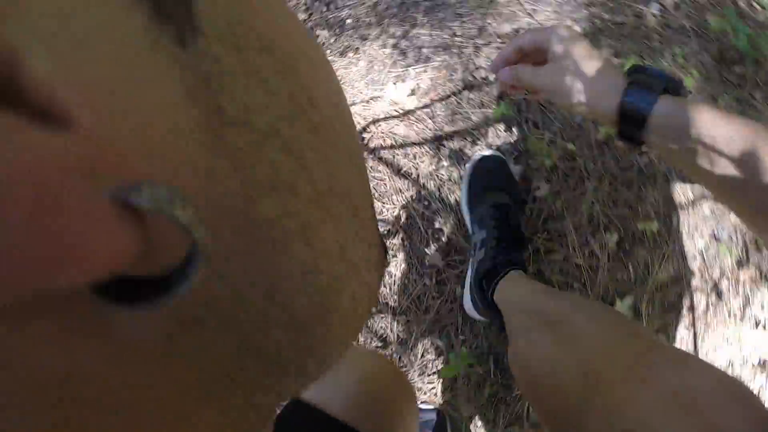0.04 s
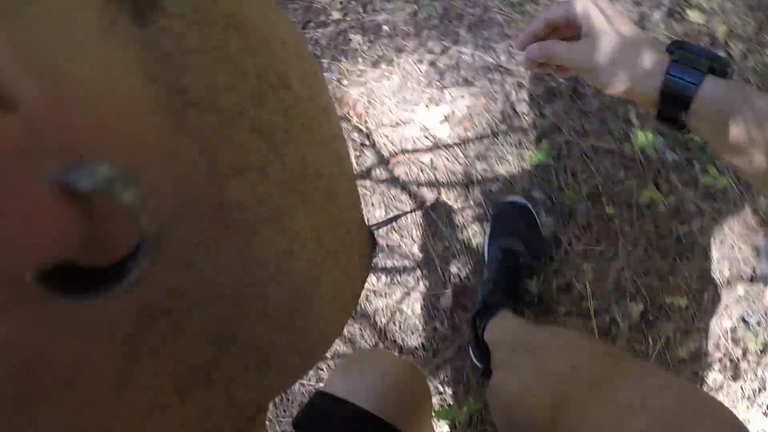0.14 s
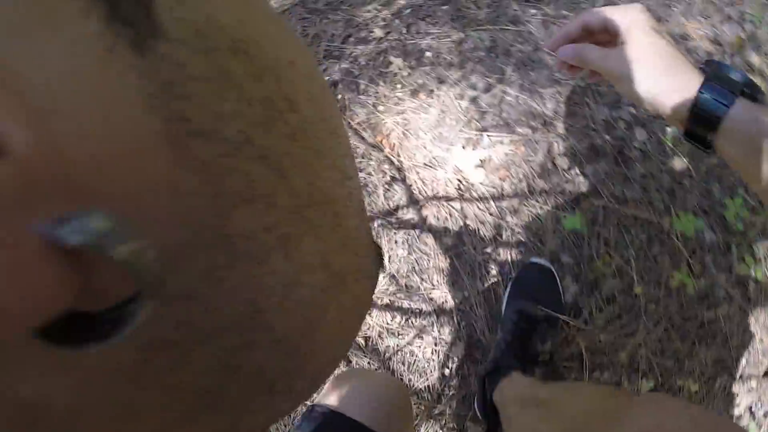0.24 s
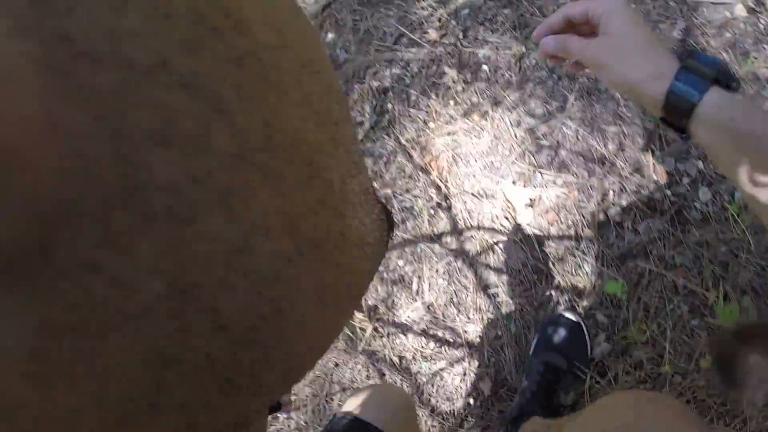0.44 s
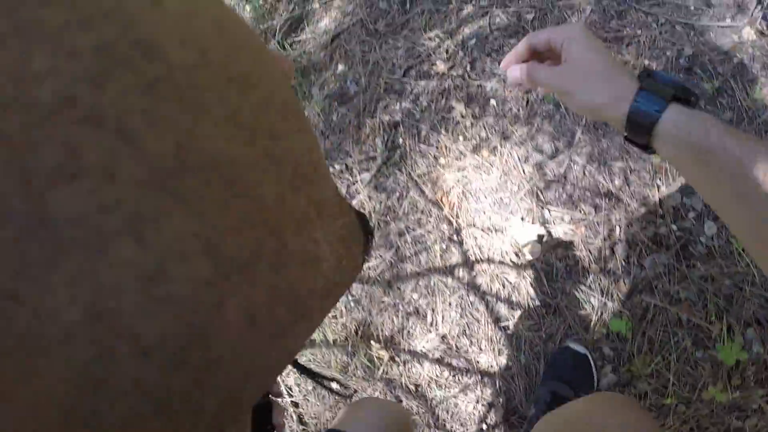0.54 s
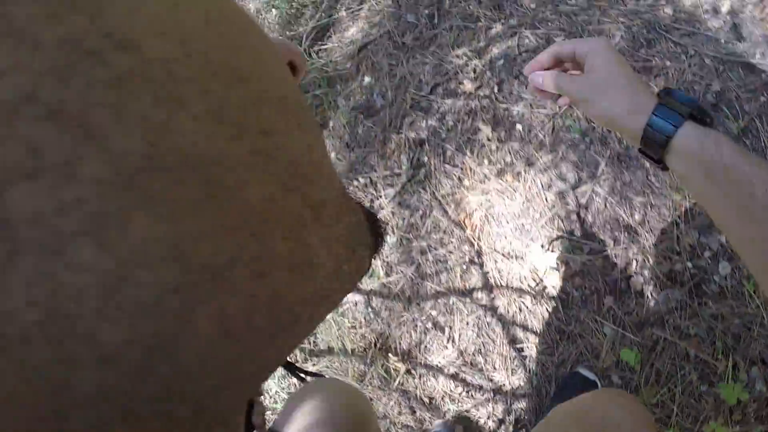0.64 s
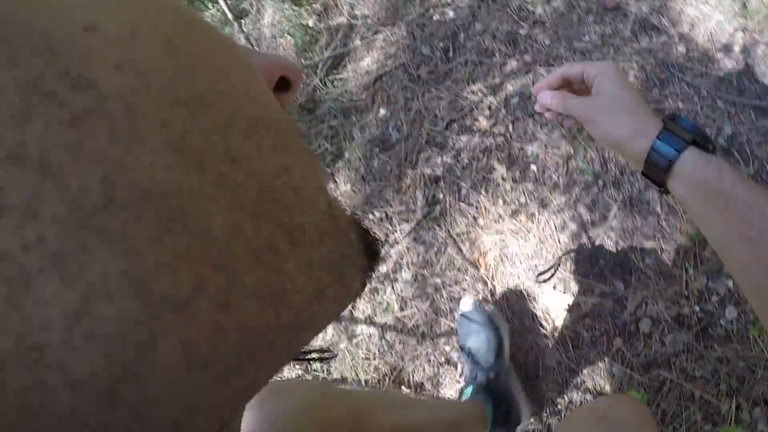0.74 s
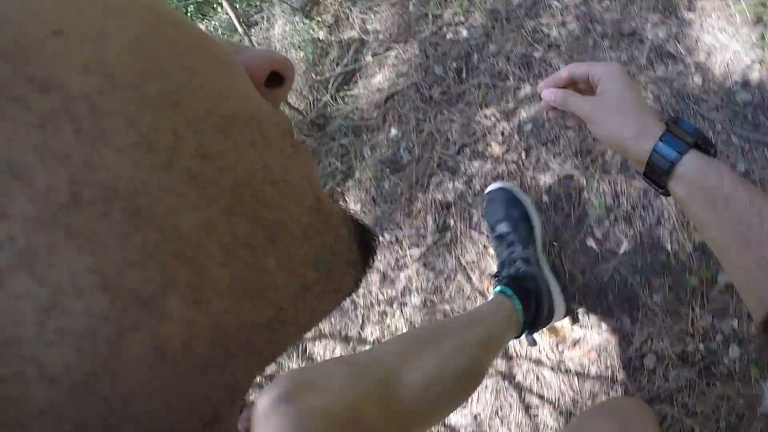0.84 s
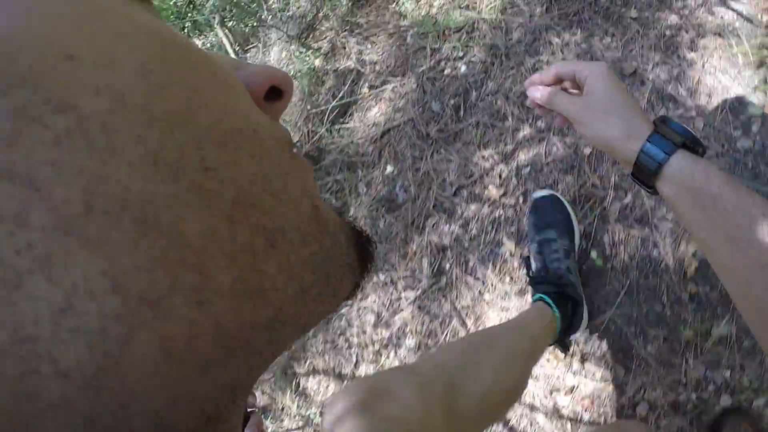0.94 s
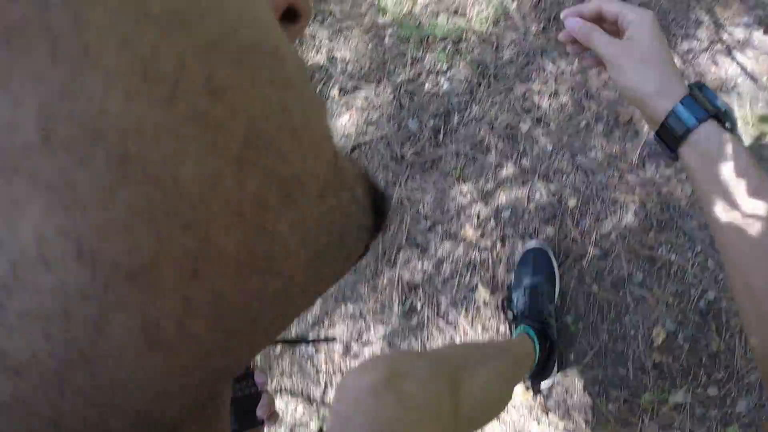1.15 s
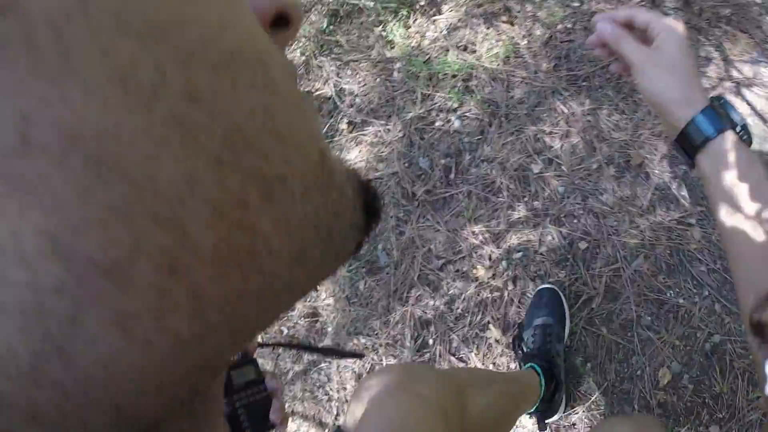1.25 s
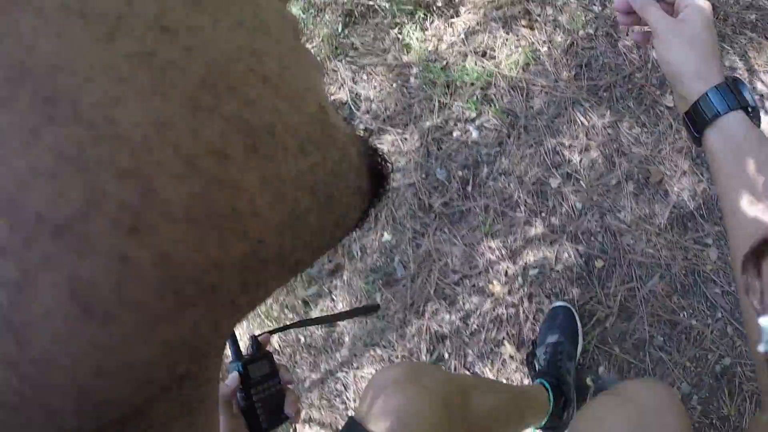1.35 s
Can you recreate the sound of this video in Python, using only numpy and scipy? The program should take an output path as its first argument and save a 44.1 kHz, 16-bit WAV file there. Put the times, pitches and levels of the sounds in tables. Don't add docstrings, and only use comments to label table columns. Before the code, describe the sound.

A stiff twig snaps very loudly at the microphone amid footsteps rustling in dry forest litter

```python
import sys
import numpy as np
from scipy import signal
from scipy.fft import rfft, irfft
from scipy.io import wavfile
from scipy.ndimage import uniform_filter1d

SR = 44100
rng = np.random.default_rng(int(sys.argv[2]) if len(sys.argv) > 2 else 0)


def persist_wave(psi):
    counts = np.round(np.clip(psi, -1, 1) * 32767).astype(np.int16)
    wavfile.write(sys.argv[1], SR, np.atleast_2d(counts).T)


def nominal_scale(level):
    x = np.asarray(level, float) / 20
    return 10 ** x


N = 61739

# t/s, level/dB; it falls steeply just after the snap, then creeps back up
GUSTS = [(0, -34.5), (.1, -37), (.2, -29), (.225, -51), (.29, -46), (.36, -52.5), (.43, -64), (.5, -54),
         (.6, -51.5), (.68, -49.5), (.8, -55), (.86, -45), (.93, -52), (1.03, -47), (1.13, -36), (1.2, -41),
         (1.3, -48), (1.4, -43.5)]
# f/Hz, level/dB per Hz
RUMBLE_COLOUR = [(7, -0.5), (14, -5), (30, -7), (65, -16.5), (120, -29), (250, -39), (500, -51.5),
                 (1000, -62.5)]
# t/s, level/dB, crunch share/dB, brightness/dB per octave, crunch pitch factor
TREAD = [(0, -52.5, -3, -2.5, 1.), (.10, -49.5, -17.5, 0, 1.), (.205, -54.5, 2, -2.5, 1.2),
         (.222, -55.5, 4.5, -11, 1), (.30, -69, -1, -6, 1.017), (.40, -68.5, -11, -1.5, 0.97),
         (.45, -69, 0.5, -0.5, 1.18), (.55, -67.5, 3, -2.5, 1.1), (.585, -69.5, -6, -4.5, 1.05),
         (.61, -61.5, -2, 0.5, 1.02), (.75, -63, 2.5, -1.5, 1.01), (.85, -61.5, 1, -0.5, 1.01),
         (.97, -58.5, -2, -2, 1.1), (1.04, -58, -3.5, -3.5, 1.01), (1.15, -54.5, -1.5, -2.5, .98),
         (1.27, -55, -6, -2.5, .99), (1.4, -56.5, -0.5, -4, .86)]
# f/Hz, level/dB per Hz
LITTER_COLOUR = [(100, -0.5), (480, -8.5), (1500, -10), (3800, -14.5), (6300, -11), (7200, -24),
                 (10800, -21), (13800, -40)]
# f/Hz, level/dB, t60/s
NEEDLES = [(2280, -10.5, 0.0038), (2680, 0, 0.009), (3150, -5, 0.0085), (4546, -6, 0.011),
           (5415, -13.5, .005), (5740, -12, .005)]
# centre t/s, length/s, lift/dB
SCUFFS = [(0.028, 0.035, 9.5), (0.127, 0.017, 11.5), (0.156, 0.018, 4), (0.46, 0.019, 13), (0.48, 0.037, 7),
          (0.508, 0.016, 5), (0.531, 0.026, 2), (0.596, 0.035, 11), (0.617, 0.011, 7), (0.632, 0.026, 9),
          (0.663, 0.0091, 3), (0.676, 0.019, 15.5), (0.696, 0.011, 8), (0.705, 0.013, 11),
          (0.724, 0.011, 8.5), (0.74, .007, 8), (0.753, 0.0084, 7.5), (0.772, 0.012, 4), (0.79, 0.0065, 3),
          (0.796, .004, 4), (0.86, 0.056, 2.5), (0.954, 0.038, 1.5), (1.104, 0.048, 2.5), (1.15, 0.059, 2),
          (1.176, 0.012, 2), (1.235, 0.06, 1.5), (1.328, 0.083, 6), (1.366, .012, 2)]
# t/s, peak level/dB, thump/dB, body/dB, brightness/dB per octave
KNOCKS = [
    (0.0245, -38.5, -18, -28, -12),
    (0.1136, -24.5, -24, -16, 7.5),
    (0.261, -38, 10.5, -1, 1.5),
    (0.2841, -43.5, 0, 1.5, 9.5),
    (0.2912, -40.5, 11.5, -4, 1),
    (0.2982, -49, -2, -1, 5),
    (0.668, -39.5, -4, -5.5, -3.5),
    (0.671, -35, 0.5, 0.5, -10),
    (1.0005, -31, -16.5, -13, 1.5),
]
# f/Hz, level/dB, t60/s
MOUNT = [(84, 0.5, 0.025), (231, 3.5, 0.019), (427, -0.5, 0.012), (817, 0.5, 0.02), (1224, -5, 0.025),
         (1714, -1.5, 0.013), (2180, -15, 0.0093), (2670, -8.5, 0.015), (4550, -24.5, 0.0094)]
# t/s, peak level/dB, centre f/Hz, t60/s
TICKS = [(.143, -43, 10500, 0.0067), (.157, -41, 10000, 0.004), (.175, -40, 9800, 0.0031),
         (.187, -39.5, 9940, 0.0098), (.4975, -43, 9300, 0.0054), (.4978, -55, 10860, .005),
         (.511, -64, 6200, 0.0089), (.6144, -45, 4660, 0.016), (.6688, -41.5, 4800, 0.037),
         (.703, -49, 4820, 0.011), (.883, -52, 7100, 0.0095), (1.128, -51, 7800, 0.011)]
# t/s, peak level/dB, centre f/Hz, t60/s
CRACKS = [(.1912, -37, 4800, 0.048), (.1915, -46, 12840, 0.02), (.2113, -36, 3020, .03),
          (.2286, -25.5, 12600, .006), (.3245, -59, 5600, 0.016), (.343, -59.5, 4770, 0.032),
          (.392, -64, 5200, 0.019), (.4240, -43, 1560, 0.014), (.4241, -40.5, 3440, 0.012),
          (.4242, -38.5, 6600, 0.01), (.452, -43, 3425, 0.0066), (.4595, -41, 3100, 0.017),
          (.4590, -51, 10700, 0.0098), (.6690, -36.5, 3150, 0.033), (.6688, -53.5, 7450, 0.011)]
BREAK_TIMES = [.2141, .2180, .2208, .2236, .2252, .2286, .2316, .2323]
# level/dB, crack length/s, treble/dB, ring length factor
BREAKS = [
    (5, 0.002, 3, 0.97),
    (-12, 0.00033, -5.5, 0.74),
    (-16, 0.0015, -2.5, 1.2),
    (-20, 0.0015, -10.5, 0.37),
    (-13.5, .0008, -7, 0.99),
    (-18.5, 0.00076, 8, 0.74),
    (-10.5, 0.0008, 4, 1.1),
    (-2, 0.00062, -5, 1),
]
# f/Hz, level/dB, t60/s
TWIG = [(1280, -16.5, 0.0069), (1687, -0.5, 0.012), (2133, -2, 0.02), (2325, 4.5, 0.0098),
        (2904, -7.5, 0.016), (3320, -10.5, 0.014), (4051, -21, 0.018), (4877, -10, 0.013),
        (5730, -13, 0.017), (6325, -15, .008), (7730, -13, 0.0051), (9330, -10.5, 0.0026)]
# f/Hz, level/dB, t60/s
STUB = [(1255, 1.5, 0.013), (1710, -10, 0.013), (2164, -0.5, 0.012), (2550, -2.5, 0.012),
        (3230, -10, 0.017), (4210, -13, 0.013), (4530, -13, 0.0092), (5410, -19, .02), (5970, -10.5, 0.011),
        (7600, -20, .008), (9250, -21.5, .006)]
# f/Hz, level/dB, t60/s
THUD = [(89.3, -28, 0.078), (181, -19.5, 0.036), (305, -17.5, 0.024), (692, -21, 0.03)]
# f/Hz, level/dB, t60/s
LAST_RINGS = [(1235, -28, .06), (1852, -56, .55), (2040, -46, .12), (5720, -48, .055)]


def evened(x):
    return x / np.sqrt(np.mean(x ** 2) + 1e-20)


def read(points, hz):
    f, value = np.transpose(points)
    return np.interp(np.log(hz + 1), np.log(f + 1), value)


def curve(table, t, axis=1):
    return np.interp(t, np.array(table)[:, 0], np.array(table)[:, axis])


def add(mix, s, sound):
    part = mix[round(s * SR):][:len(sound)]
    part += sound[:len(part)]


def shaped(x, gain_db):
    hz, t, z = signal.stft(x, SR, nperseg=512, noverlap=384)
    z = z * nominal_scale(gain_db(hz[:, None], t[None]))
    return signal.istft(z, SR, nperseg=512, noverlap=384)[1][:N]


def low_pass(x, hz):
    return signal.oaconvolve(x, signal.firwin(511, hz, window=("kaiser", 4), fs=SR), "same")


def resonate(x, hz, t60):
    turn = np.exp(2j * np.pi * np.cumsum(hz) / SR)
    decay = nominal_scale(-60 / t60 / SR)
    return (turn * signal.lfilter([1], [1, -decay], x / turn)).imag


def mode(hz, db, t60, seconds):
    t = np.arange(0, seconds, 1 / SR)
    return nominal_scale(db - 60 * t / t60) * np.sin(2 * np.pi * hz * t)


def struck(modes, seconds, rise_s):
    ring = sum((-1) ** k * mode(*m, seconds) for k, m in enumerate(modes))
    t = np.arange(len(ring)) / SR
    return ring * (1 - np.exp(-t / rise_s))


def rumble():
    z = rfft(rng.standard_normal(N)) * nominal_scale(read(RUMBLE_COLOUR, np.fft.rfftfreq(N, 1 / SR)))
    wind = evened(irfft(z, N))
    local_power = uniform_filter1d(wind ** 2, size=3000)
    wind = wind / (local_power + .05) ** .42
    return evened(wind) * nominal_scale(curve(GUSTS, np.arange(N) / SR))


def rustle():
    t = np.arange(N) / SR
    grains_per_s, grain_spread_db, clump_db = 4500, 2.5, 1.6

    clumps = rng.standard_normal((len(NEEDLES) + 1, N))
    clumps = uniform_filter1d(uniform_filter1d(clumps, size=300), size=300)
    clumps = clumps / clumps.std()
    shared = clumps[-1]

    size = nominal_scale(grain_spread_db * np.minimum(rng.exponential(1, N), 4)) * rng.choice([-1., 1.], N)
    grains = evened(size * (rng.random(N) < grains_per_s / SR))
    grains = grains + 0.2 * rng.standard_normal(N)
    soft = uniform_filter1d(grains, size=3)
    pitch = curve(TREAD, t, axis=4)
    crunch = np.zeros(N)
    for (hz, db, t60), own in zip(NEEDLES, clumps):
        swell_db = clump_db * np.tanh((shared + own) / 2) * 2
        crunch += resonate(soft * nominal_scale(db + swell_db), hz * pitch, t60)
    crunch = evened(crunch)

    hiss = rng.standard_normal(N) * nominal_scale(0.37 * shared) + 0.13 * grains
    wash = evened(shaped(hiss, lambda hz, s: read(LITTER_COLOUR, hz) + 0 * s))

    lift_db = sum(db * np.exp(-((t - s) / length) ** 2 * 8) for s, length, db in SCUFFS)
    crunch_db = curve(TREAD, t, axis=2) + 1.43 * lift_db
    mix = wash * nominal_scale(0.61 * lift_db) + crunch * nominal_scale(crunch_db)

    def tilt(hz, s):
        return curve(TREAD, s, axis=3) * np.log2((hz + 900) / 3400)

    return shaped(mix, tilt) * nominal_scale(curve(TREAD, t))


def knocks():
    out = np.zeros(N)
    tunings = rng.uniform(0.97, 1.02, (len(KNOCKS), len(MOUNT)))
    for (s, db, thump_db, body_db, bright_db), tuning in zip(KNOCKS, tunings):
        modes = []
        for (hz, level_db, t60), tune in zip(MOUNT, tuning):
            if hz < 150:
                lift_db = thump_db
            elif hz < 600:
                lift_db = body_db
            else:
                lift_db = bright_db * np.log2(hz / 1200)
            modes.append((hz * tune, level_db + lift_db, t60))
        add(out, s, -nominal_scale(db) * struck(modes, .08, rise_s=.0008))
    return out


def cracks(table, octaves):
    out, t, hz = np.zeros(N), np.arange(2048) / SR, np.fft.rfftfreq(2048, 1 / SR)
    rise = np.minimum(t / .0007, 1)
    for (s, db, centre_hz, t60), noise in zip(table, rng.standard_normal((len(table), 2048))):
        distance = abs(np.log2((hz + 30) / centre_hz) / octaves)
        colour = nominal_scale(-6 * distance ** 2) + 0.044 * (hz > 1200)
        burst = evened(irfft(rfft(noise) * colour))
        add(out, s, nominal_scale(db - 1.5 - 60 * t / t60) * rise * burst)
    return out


def snap():
    out, t = np.zeros(N), np.arange(300) / SR
    noises = rng.standard_normal((len(BREAKS), 300))
    for s, (db, length, treble_db, ring), noise in zip(BREAK_TIMES, BREAKS, noises):
        piece = TWIG if s < BREAK_TIMES[-2] else STUB
        modes = [(hz, d + treble_db * (hz > 3600), t60 * ring) for hz, d, t60 in piece]
        shove = noise * np.exp(-(t / length) ** 2)
        shove = shove / np.linalg.norm(shove)
        add(out, s, nominal_scale(db) * signal.fftconvolve(shove, struck(modes, .05, rise_s=.0001)))
        add(out, s, nominal_scale(db + treble_db - 21.5) * np.diff(shove))
    out = signal.sosfilt(signal.butter(4, 1050, "high", fs=SR, output="sos"), out)
    add(out, BREAK_TIMES[0], struck(THUD, .1, rise_s=.00043))
    add(out, BREAK_TIMES[-1], struck(LAST_RINGS, .165, rise_s=.001))
    return out


def scene():
    quiet = rumble() + rustle() + knocks()
    quiet = quiet + cracks(TICKS, octaves=.2) + cracks(CRACKS, octaves=.5)
    return (low_pass(quiet, 13800) + snap())[None]


def band_limit(x):
    return signal.sosfilt(signal.butter(12, 16510, fs=SR, output="sos"), x)


def record(dry):
    clipped = np.clip(dry[0], -.93, .93)
    mix = low_pass(clipped, 15100)[None]
    return band_limit(mix)


dry = scene()
out = record(dry)
persist_wave(out)
```